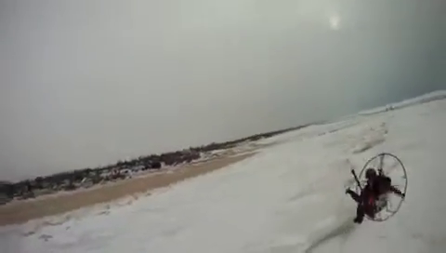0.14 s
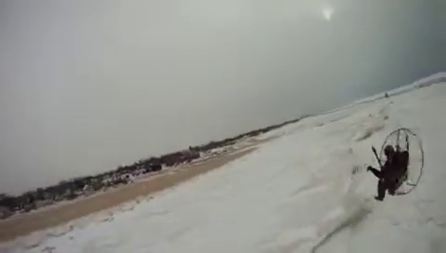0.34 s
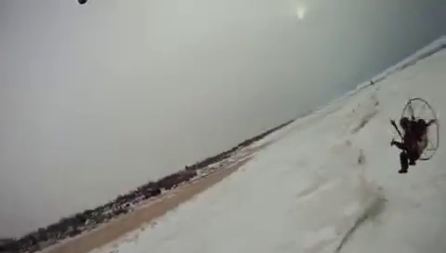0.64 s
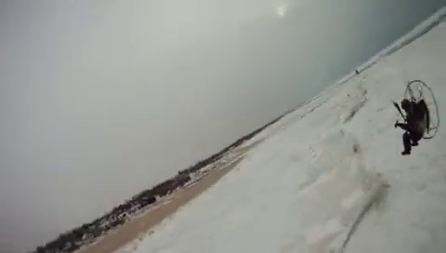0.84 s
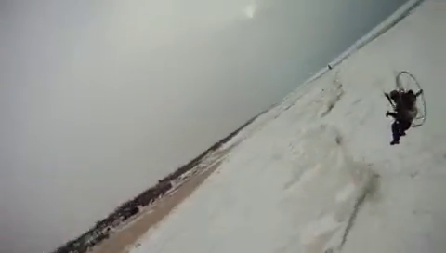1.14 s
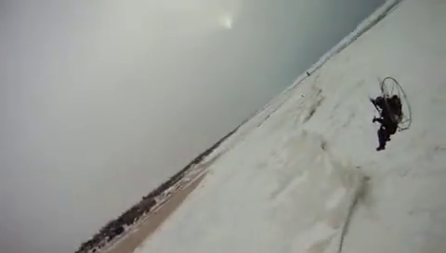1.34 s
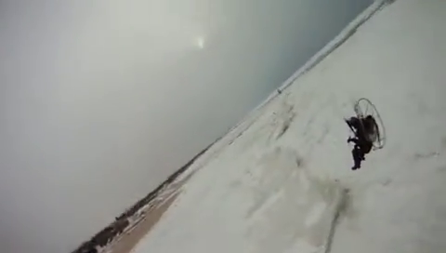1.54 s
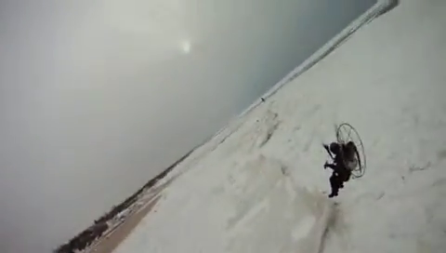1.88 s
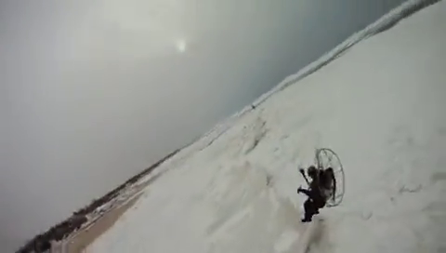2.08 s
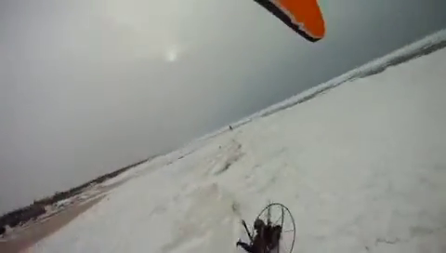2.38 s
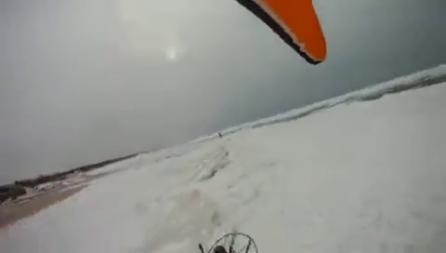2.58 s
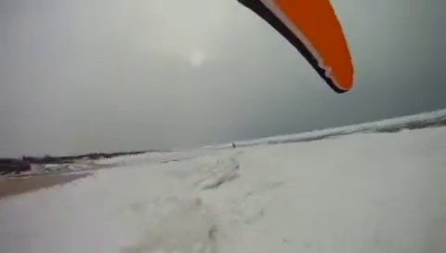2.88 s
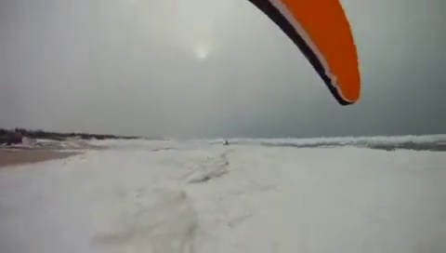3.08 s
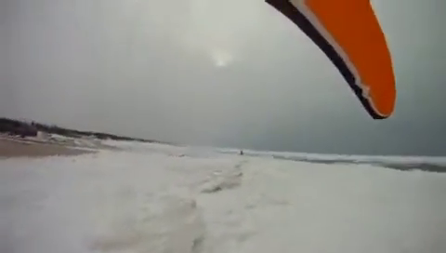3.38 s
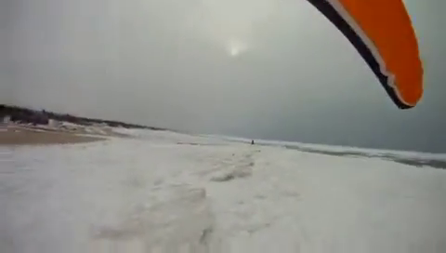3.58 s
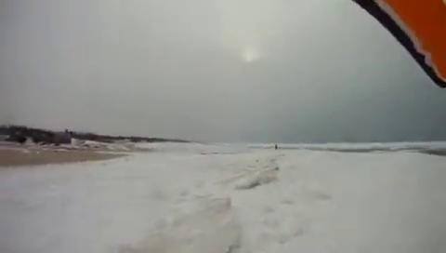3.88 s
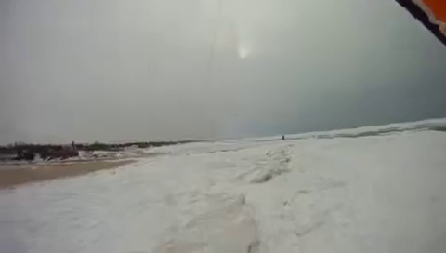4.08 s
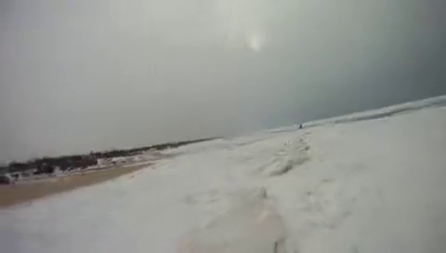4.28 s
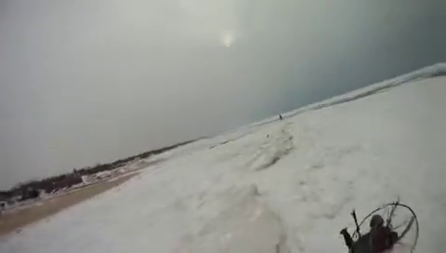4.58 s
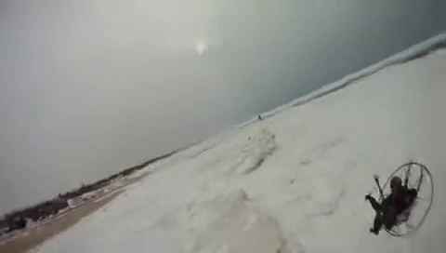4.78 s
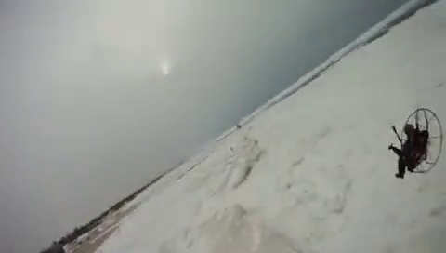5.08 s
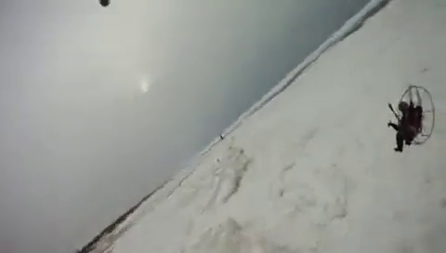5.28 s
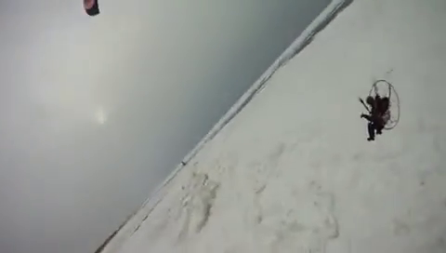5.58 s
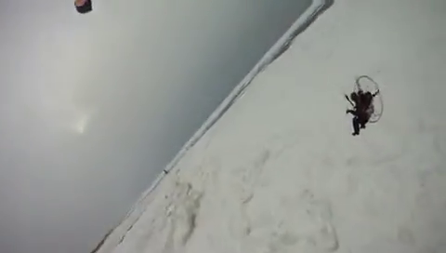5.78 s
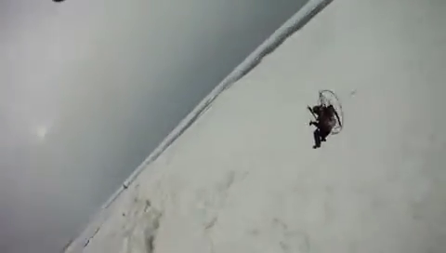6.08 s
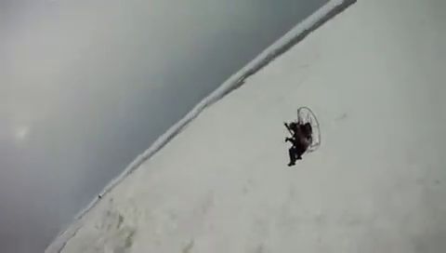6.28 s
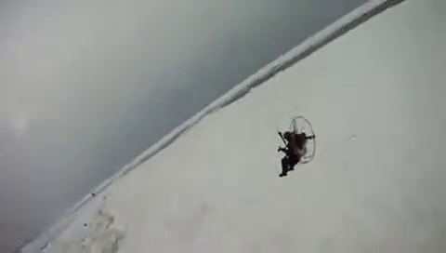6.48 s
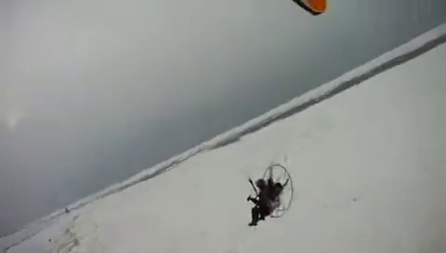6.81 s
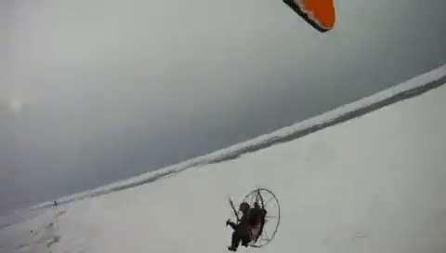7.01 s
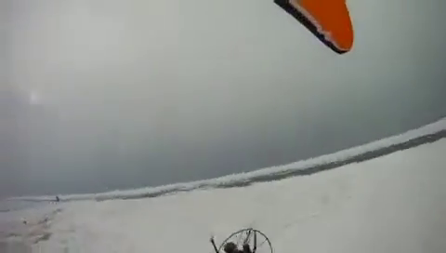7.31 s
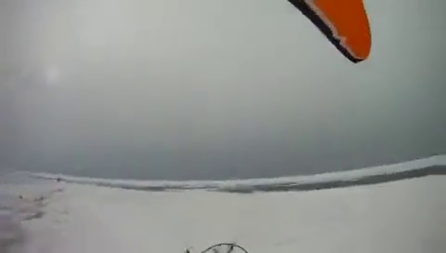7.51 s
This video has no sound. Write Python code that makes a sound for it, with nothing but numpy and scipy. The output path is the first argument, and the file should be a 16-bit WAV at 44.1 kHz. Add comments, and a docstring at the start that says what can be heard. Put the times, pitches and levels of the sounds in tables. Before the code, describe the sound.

A paramotor's small two-stroke engine and propeller drone without a break for about seven and a half seconds, heard from the pilot's helmet. The buzz is thin and hissy, with a slight metallic fizz, and its colour slides as the head turns. Wind rushes and booms on the microphone throughout, easing between 1 and 2 seconds so that the buzz stands out, then building again. The engine's pitch lifts a little around 1.5 seconds. From about 2.8 to 4.3 seconds a high engine tone swells, holds and fades. A faint breathy whistle comes and goes, clearest around 3 and 4 seconds and returning near the end. From 4 seconds on, low gusts thump more often and harder, notably around 6, 6.5, 7 and 7.5 seconds. From about 5.5 seconds the engine gradually climbs slightly in pitch.

```python
"""A two-stroke paramotor cruises, heard from a small camera on the pilot's helmet.
Periodic firings make a harmonic buzz, and propeller blades and exhaust puffs modulate a hiss.
Both change colour as the head turns aside and back; a high engine tone swells when facing ahead.
A breathy whistle comes and goes. The airstream rushes, shakes the mount and sets the camera case
booming, and the camera's coarse sampling adds a metallic fizz."""
import sys
import numpy as np
from scipy import signal
from scipy.fft import rfft, irfft, next_fast_len
from scipy.io import wavfile
from scipy.ndimage import uniform_filter1d

SR = 44100
rng = np.random.default_rng(int(sys.argv[2]) if len(sys.argv) > 2 else 0)


def wrap_up_sound(samples):
    """Save the sound to the file named by the first command line argument, as 16-bit audio."""
    columns = np.atleast_2d(samples).T
    # keep every value between -1 and 1, then stretch to whole-number steps
    tamed = np.clip(columns, -1, 1)
    steps = np.round(tamed * 32767).astype(np.int16)
    wavfile.write(sys.argv[1], SR, steps)


N = 337365
CAMERA_RATE_HZ = 12000


def undb(db):
    """Amplitude ratio of a level in decibels."""
    return 10 ** (np.asarray(db) / 20)


def curves(table, times=None):
    """Linear interpolation of a table's columns in time."""
    knots_s, *columns = np.transpose(table)
    times = np.arange(N) / SR if times is None else times
    return [np.interp(times, knots_s, column) for column in columns]


def spectrum_db(points, hz):
    """Linear interpolation of levels on a log-frequency axis."""
    knots_hz, db = np.transpose(points)
    return np.interp(np.log(hz + 1), np.log(knots_hz), db)


def unit(x):
    """Normalisation to rms 1."""
    return x / np.std(x)


def noise(gain):
    """Spectral shaping: white noise weighted by a function of frequency, at rms 1."""
    size = next_fast_len(N, True)
    white = rfft(rng.standard_normal(size))
    return unit(irfft(white * gain(np.fft.rfftfreq(size, 1 / SR)), size)[:N])


def resonance(f, hz, width):
    """Frequency response of a damped oscillator."""
    return 1j * f * width / (hz ** 2 - f ** 2 + 1j * f * width)


def wander(rate_hz):
    """Low-pass noise: a slow random fluctuation of rms 1."""
    return noise(lambda f: np.exp(-(f / rate_hz) ** 2))


def steady(x, span_s):
    """Division by the running rms evens out swells slower than the span."""
    size = int(span_s * SR)
    power = uniform_filter1d(uniform_filter1d(x ** 2, size), size)
    return x / np.sqrt(power + 1e-9)


def burst_power(table, attack_s, release_s):
    """Incoherent events add in power; each rises, holds and decays exponentially."""
    t = np.arange(N) / SR
    power = np.zeros(N)
    for start, length, db in table:
        rise = np.clip((t - start) / attack_s, 0, 1)
        decay = np.exp(-np.maximum(t - start - length, 0) / release_s)
        power += (undb(db) * rise * decay) ** 2
    return power


# Strength of the airstream. Each row: time in seconds, relative level in dB.
AIR_STRENGTH = [(0.0, -0.5), (0.75, -4), (1.2, -7.5), (1.9, -10.5), (2.7, -2.5), (3.6, -2), (4.35, 2),
                (4.8, -1), (5.3, 1), (7.65, 1.5)]
# Spectrum of the rushing air. Each row: frequency in Hz, relative level in dB.
RUSH_SPECTRUM = [(25, -28), (55, -1), (90, 6), (200, -2), (265, -7), (320, 1.5), (425, 0), (475, -9.5),
                 (580, -17.5), (760, -9.5), (850, -2.5), (980, -2), (1120, -12), (5000, -61)]
# Eddies that shake the mount. Each row: start in seconds, length in seconds, level in dB.
MOUNT_SHAKES = [(0.25, 0.6, -39), (1.15, 0.2, -36), (1.53, 0.12, -36), (2.96, 0.66, -36), (4.2, 0.3, -40),
                (4.88, 0.22, -35), (6.56, 0.13, -33), (7.3, 0.17, -36)]

def airstream():
    """Turbulence: air rushes broadly over the case, and eddies drive the mount's low resonance."""
    air_db, = curves(AIR_STRENGTH)
    rush = noise(lambda f: undb(spectrum_db(RUSH_SPECTRUM, f)))
    rush *= undb(-35.5 + air_db + 0.5 * wander(rate_hz=8.1))
    rumble = noise(lambda f: resonance(f, hz=42, width=15) ** 2)
    calm_power = undb(-40 + 0.5 * air_db) ** 2
    shake_power = burst_power(MOUNT_SHAKES, attack_s=0.038, release_s=0.056)
    return rush + steady(rumble, span_s=0.08) * np.sqrt(calm_power + shake_power)


# Modes of the camera case. Each row: frequency in Hz, width in Hz, relative level in dB.
CASE_MODES = [(135.35, 8.5, 4.5), (131.2, 23, -4), (169.4, 7.6, -6), (104.5, 17, -21.5)]
# Gusts on the case. Each row: start in seconds, length in seconds, level in dB.
CASE_GUSTS = [(0.12, 0.29, -26.5), (0.5, 0.42, -33), (0.89, 0.11, -25.5), (1.14, 0.066, -26.5),
              (1.3, 0.39, -35.5), (3.42, 0.076, -26), (3.75, 0.2, -31.5), (4.01, 0.059, -23.5),
              (4.15, 0.06, -23), (4.33, 0.13, -24.5), (4.5, 0.056, -23.5), (4.79, 0.17, -27.5),
              (5.09, 0.28, -23), (5.42, 0.29, -27.5), (5.94, 0.075, -21), (6.1, 0.17, -26),
              (6.55, 0.072, -18), (6.65, 0.19, -30), (6.97, 0.12, -20.5), (7.18, 0.075, -21.5),
              (7.32, 0.2, -32), (7.53, 0.12, -19.5)]

def buffeting(low_hz=93, high_hz=196):
    """Forced vibration: the airstream and its gusts set the case booming at its low modes."""
    air_db, = curves(AIR_STRENGTH)
    boom = sum(undb(db) * noise(lambda f: resonance(f, hz, width) * resonance(f, hz, 5 * width))
               for hz, width, db in CASE_MODES)
    calm_power = undb(-31.5 + 0.5 * air_db + 2.4 * wander(rate_hz=12)) ** 2
    gust_power = burst_power(CASE_GUSTS, attack_s=0.016, release_s=0.038)
    boom = steady(boom, span_s=0.049) * np.sqrt(calm_power + gust_power)
    band = signal.butter(5, [low_hz, high_hz], "band", fs=SR, output="sos")  # keeps sudden gusts dull
    return signal.sosfiltfilt(band, boom, padtype=None)


# Swells of the whistle. Each row: start in seconds, length in seconds, level in dB.
WHISTLE_SWELLS = [(-0.1, 0.28, -37), (1.5, 0.64, -38.5), (2.75, 0.31, -34.5), (3.4, 0.48, -38.5),
                  (3.95, 0.4, -29.5), (7.2, 0.5, -37)]

def whistle(ahead_hz=2122, slide_hz=128.3, width_hz=45):
    """Narrow-band noise is heard as a breathy pitch; it rises a little as the head turns aside."""
    aside, _ = curves(HEAD_POSE)
    phase = 2 * np.pi * np.cumsum(ahead_hz + slide_hz * aside) / SR
    band = unit(wander(width_hz) * np.cos(phase) + wander(width_hz) * np.sin(phase))
    return band * np.sqrt(burst_power(WHISTLE_SWELLS, attack_s=0.15, release_s=0.13))


# The pilot's head. Each row: time in seconds, turn from 0 (ahead) to 1 (aside), motor gain in dB.
HEAD_POSE = [(0.0, 0.55, -1.6), (0.4, 0.77, -1.5), (0.8, 0.86, -1), (1.3, 0.87, -2), (1.7, 0.64, -5),
             (2.0, 0.55, -4), (2.55, 0.15, -1), (2.9, 0.049, -0.1), (3.2, 0.02, 1.3), (4.1, 0.02, 1.5),
             (4.45, 0.23, 1.5), (4.8, 0.64, -1.5), (5.2, 0.96, 1.9), (5.6, 0.95, 0.6), (6.0, 0.71, -0.6),
             (6.4, 0.59, -2), (7.0, 0.23, -1), (7.65, 0.1, 3.5)]
# Spectral envelope of the motor. Each row: frequency in Hz, spectral density level in dB.
MOTOR_SPECTRUM = [(300, -100), (600, -83.5), (900, -81.5), (1080.0, -84.5), (1300.0, -66), (2100.0, -62),
                  (3000.0, -71.5), (3900.0, -71.5), (5300.0, -77), (5700.0, -81), (5950.0, -88)]
# The motor's treble. Each row: time in seconds, gain at 6 kHz in dB.
MOTOR_TREBLE = [(0.0, 3.5), (1.2, -1.5), (2.8, 4.5), (3.3, -3.5), (4.8, 4), (5.4, -10), (6.5, -12),
                (7.1, 7), (7.65, 3.5)]
# Peaks and notches around the helmet. Each row: frequency facing ahead in Hz, its shift when
# fully aside in Hz, width in Hz, then gains in dB facing ahead, half turned and aside.
HELMET_BANDS = [(1245, -46.0, 53, 7.5, 6, -17), (1440, -37.0, 215, 4.5, 4.5, -2.5),
                (1756, -29, 52, -1, 7.5, 4), (1866, 58, 54, 10, 6, -4), (1912, 198, 104, 7, -4, -9),
                (2117, -6, 90, 9, 5.5, 5), (2230, -101.0, 52, -4.5, 2, -7.5),
                (2660, -96.0, 180, 5, -1.5, -3), (2966, -345.0, 160, -3, -8, -10),
                (3172, 47, 120, 3, 13, 4.5), (3387, -7.0, 266, 5.5, 1.5, -12.5),
                (3596, -65, 230, -9.5, 10.5, 7), (3935, -68, 108, 6.5, 12, 0.5),
                (4037, -23, 130, -9.5, -9, -8), (4715, -639.0, 330, -13.5, -4, -4.5),
                (4650, 64.0, 275, 5.5, 8.5, 5), (5012, 145.0, 440, 12.5, -2.5, 15),
                (5670, -836.0, 550, 1.5, 3.5, -18)]

def helmet(source, size=2048):
    """Diffraction round the helmet gives the motor's spectrum peaks and notches that slide with a turn."""
    f, times, frames = signal.stft(source, SR, nperseg=size)
    f = f[:, None]
    aside, gain_db = curves(HEAD_POSE, times)
    treble_db, = curves(MOTOR_TREBLE, times)
    db = spectrum_db(MOTOR_SPECTRUM, f) + gain_db + treble_db * np.minimum(f / 6000, 1) ** 6
    for hz, slide_hz, width_hz, *pose_db in HELMET_BANDS:
        bell = np.exp(-2 * ((f - hz - slide_hz * aside) / width_hz) ** 2)
        db += np.interp(aside, [0, 0.5, 1], pose_db) * bell
    coloured = signal.istft(frames * undb(db), SR, nperseg=size)[1][:N]
    return coloured * np.sqrt(CAMERA_RATE_HZ / 2)  # the source's power is spread over this band


def swish(revs, blades=2, reduction=3.85):
    """Amplitude modulation: hiss surges with each geared-down propeller blade and each exhaust puff."""
    blade_passes = revs * blades / reduction
    surge = 1 + 0.085 * np.cos(2 * np.pi * blade_passes) + 0.1 * np.cos(2 * np.pi * revs)
    hiss = noise(lambda f: f < CAMERA_RATE_HZ / 2)
    flutter = undb(0.92 * wander(rate_hz=56))
    return unit(hiss * surge * flutter)


def engine_tone(revs, harmonic=16, ahead_db=-28.5, fade_db_per_turn=170):
    """Directivity: one harmonic sings out when facing ahead and fades steeply as the head turns."""
    aside, _ = curves(HEAD_POSE)
    level_db = ahead_db - fade_db_per_turn * aside + 2.5 * wander(rate_hz=20)
    return np.sqrt(2) * np.sin(2 * np.pi * harmonic * revs) * undb(level_db)


# Engine lines of unusual strength. Each row: multiple of the firing rate, level in dB relative
# to the ordinary harmonics.
ENGINE_LINES = [(11, 5), (12.5, -0.5), (13, 6), (13.5, -29), (14, 6.5), (14.5, 5.5), (16, -8), (18, 5),
                (19, 4.5), (26, 3.5), (27, 5.5), (28, 0.5), (29, 3.5)]

def firings(revs, half_order_db=-1.0):
    """Fourier series: strong and weak firings alternate, which puts lines between the harmonics."""
    db = half_order_db * (np.arange(1, 96) % 2)
    for multiple, line_db in ENGINE_LINES:
        db[round(2 * multiple) - 1] = line_db
    # Random phases: the silencer smears each firing over the whole cycle.
    lines = undb(db) * np.exp(2j * np.pi * rng.random(len(db)))
    cycle = irfft(np.r_[0, lines], 4096)  # spans two firings
    positions = np.linspace(0, 1, len(cycle), endpoint=False)
    return unit(np.interp(revs / 2 % 1, positions, cycle))


# Engine speed. Each row: time in seconds, firing rate in Hz.
FIRING_RATE = [(0.0, 111.4), (1.0, 111.6), (1.3, 112.2), (1.8, 114.8), (2.1, 115.4), (2.8, 115.1),
               (4.0, 115.7), (5.3, 115.1), (5.7, 116.7), (6.5, 118.5), (6.9, 121.0), (7.65, 123.2)]

def motor():
    """Phase locking: one shaft, with one firing per revolution, times the buzz, swish and tone."""
    rate_hz, = curves(FIRING_RATE)
    air_db, = curves(AIR_STRENGTH)
    revs = np.cumsum(rate_hz * (1 + 0.0005 * wander(rate_hz=12))) / SR
    # Interference: moving air shifts the sound between two paths, so each line wavers on its own.
    balance = 0.43 * wander(rate_hz=4)
    buzz = undb(-6) * (np.cos(balance) * firings(revs) + np.sin(balance) * firings(revs))
    hiss = undb(-1.13) * swish(revs)
    clarity = undb(-0.155 * air_db)  # the buzz stands out from the swish as the airstream drops
    return helmet(buzz * clarity + hiss / clarity) + engine_tone(revs)


def scene():
    """Superposition of motor, whistle and wind at one microphone."""
    return (motor() + whistle() + buffeting() + airstream())[None]


def record(dry, top_hz=15300):
    """Sample and hold: the camera holds each coarse sample, which mirrors the sound into the treble."""
    coarse = signal.resample(dry, round(N * CAMERA_RATE_HZ / SR), axis=1)
    held = signal.resample(np.repeat(coarse, 4, axis=1), N, axis=1)
    lowpass = signal.ellip(16, 0.2, 80, top_hz, fs=SR, output="sos")
    return signal.sosfilt(lowpass, held)


dry = scene()
out = record(dry)
wrap_up_sound(out)
```